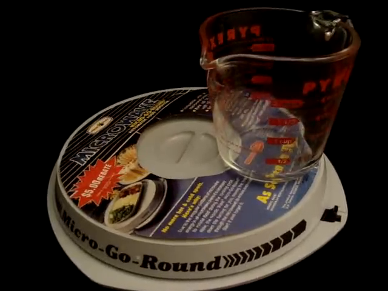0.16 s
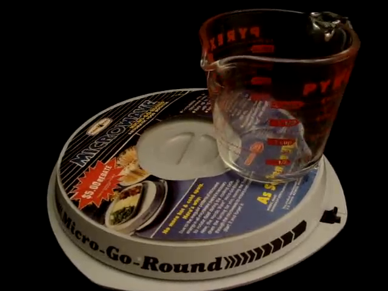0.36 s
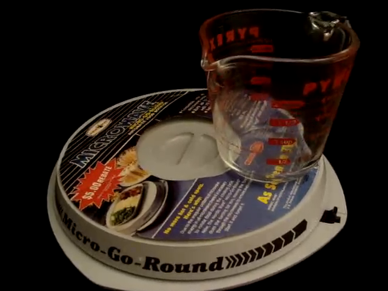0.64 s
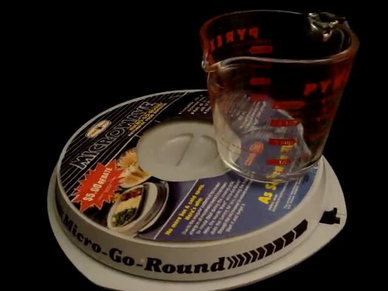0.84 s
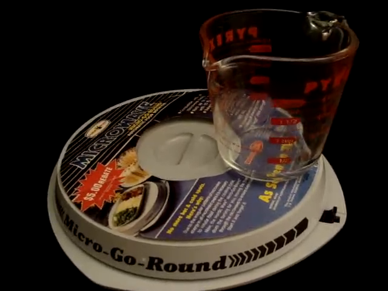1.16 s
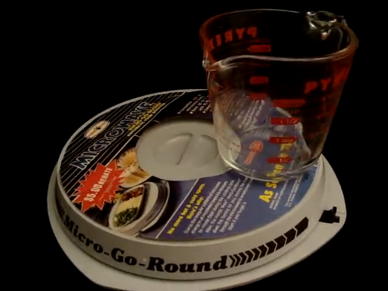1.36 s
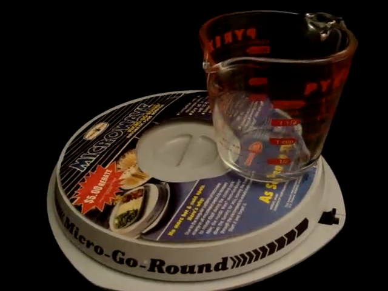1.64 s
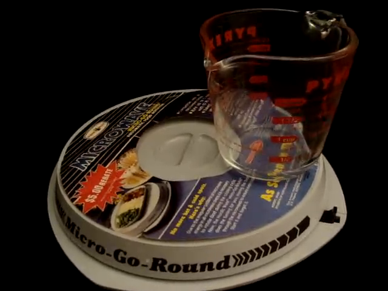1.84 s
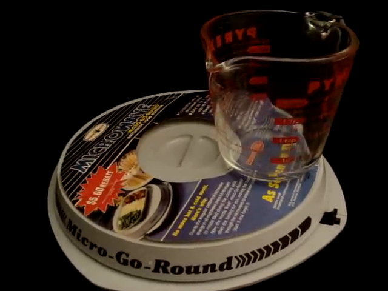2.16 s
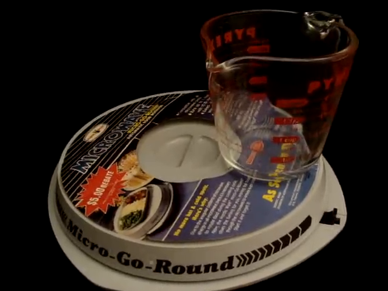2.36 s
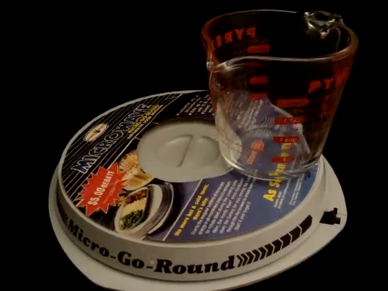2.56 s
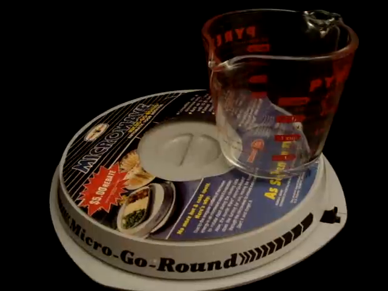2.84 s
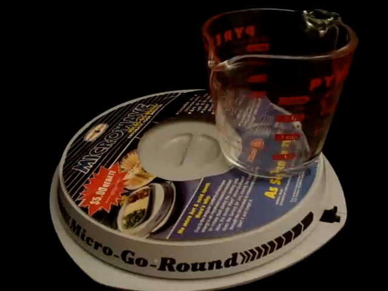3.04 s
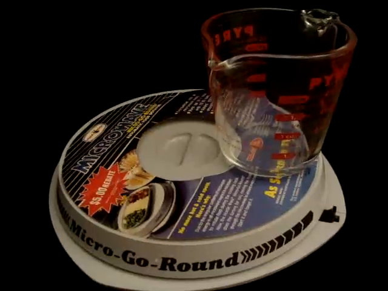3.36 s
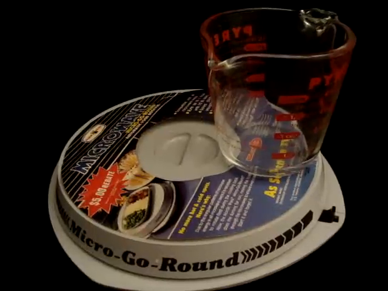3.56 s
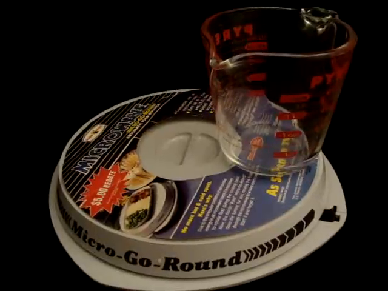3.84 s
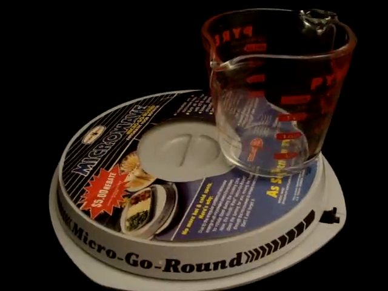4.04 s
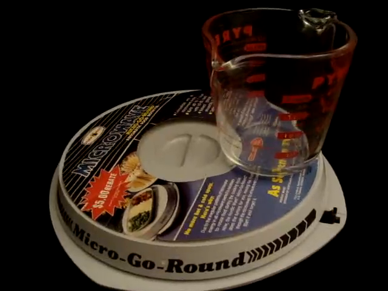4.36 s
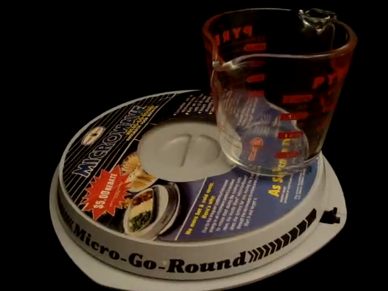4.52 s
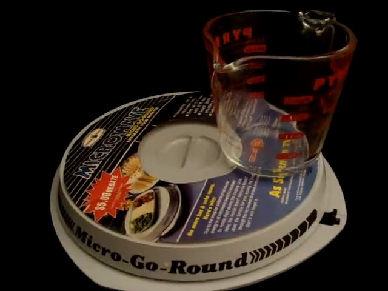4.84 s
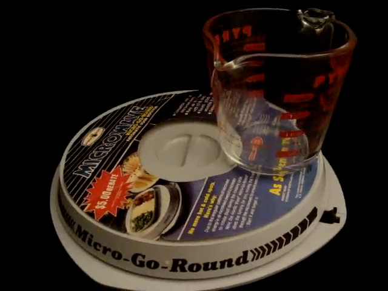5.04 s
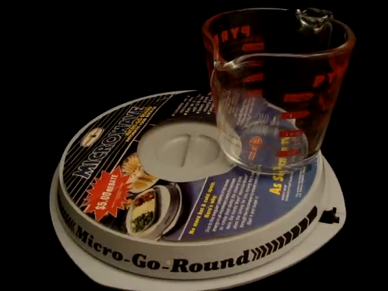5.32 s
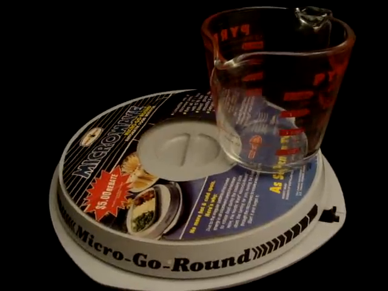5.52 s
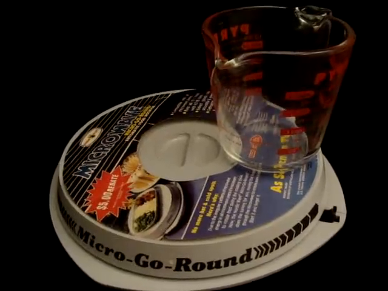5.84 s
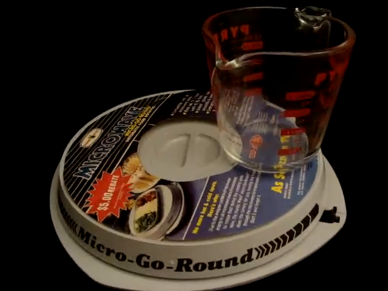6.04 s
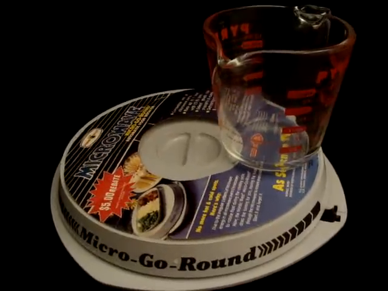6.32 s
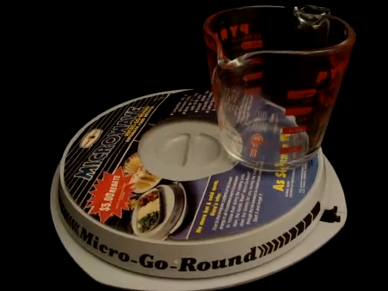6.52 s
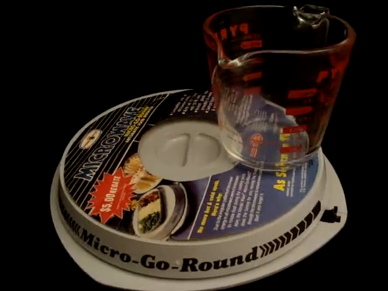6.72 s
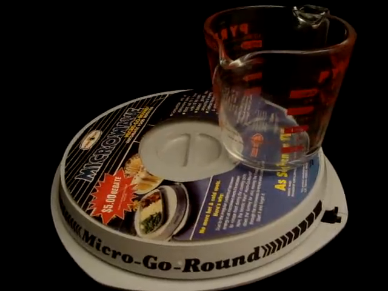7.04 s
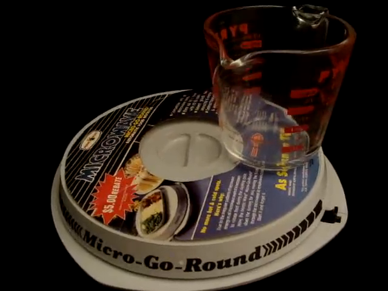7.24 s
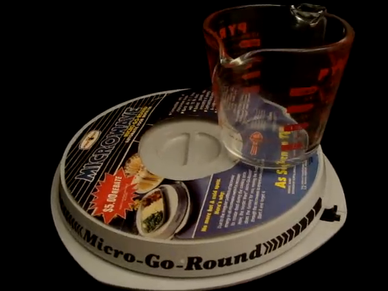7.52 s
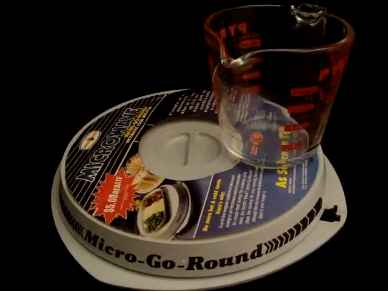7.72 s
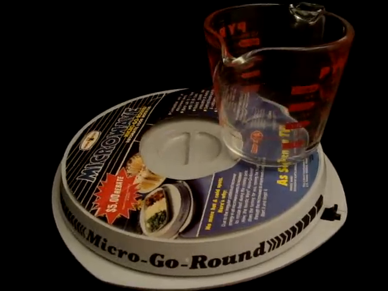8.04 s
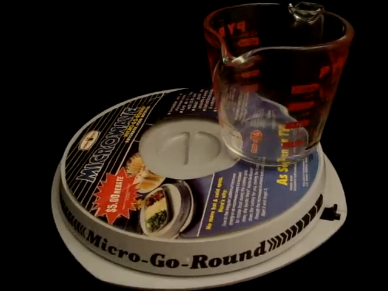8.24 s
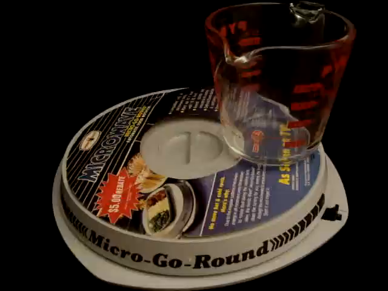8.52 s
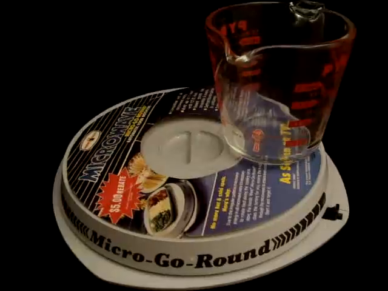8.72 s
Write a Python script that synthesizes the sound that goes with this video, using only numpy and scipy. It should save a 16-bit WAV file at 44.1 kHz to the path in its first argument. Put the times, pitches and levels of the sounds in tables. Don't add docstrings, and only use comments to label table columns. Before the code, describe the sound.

Close to the microphone, a wind-up plastic turntable clicks rapidly, about nine strokes in all each two seconds per side, tick then fuller tock. Each blow starts with a tiny scrape, snaps, and leaves a short gear rattle with hollow case and faint glass ring. Around six and a half seconds one tooth skids in a louder clattering cluster, then the beat resumes. Quiet small room, low far traffic.

```python
import sys
import numpy as np
from scipy import signal
from scipy.fft import rfft, irfft, next_fast_len
from scipy.io import wavfile
from scipy.ndimage import uniform_filter1d, map_coordinates

SR = 44100
rng = np.random.default_rng(int(sys.argv[2]) if len(sys.argv) > 2 else 0)


def attenuation_scalar(level_db):
    decades = np.asarray(level_db, float) / 20
    return 10 ** decades


def digitize_waveform(pressure):
    field = np.atleast_2d(pressure).T
    bounded = np.clip(field, -1, 1)
    quanta = np.round(bounded * 32767).astype(np.int16)
    wavfile.write(sys.argv[1], SR, quanta)


N = 391608

# pitch in Hz, level in dB per Hz.
ROOM_TONE = [(20, -10.5), (60, -4), (150, -3.5), (400, -3), (1000, -2.5), (2000, -11), (4000, -12),
             (7000, -21), (10500, -21)]
TRAFFIC_DB, TRAFFIC_GROWS_DB, TRAFFIC_SWELL_DB = -61.5, 1, 1

# pitch in Hz, width in Hz, level in a tick in dB, level in a tock in dB.
BASE = [(147, 30, -7.5, -2), (278, 20, 2, 4), (344, 85, -2, -10.5)]
CASE = [(393.7, 19, -7, -6.5), (523.8, 12, -7, -2), (565, 35, -7, -2), (655, 36, -12, -0.5),
        (741, 29, -8, -8), (875.8, 35, 5.5, 5.5), (1050.4, 140, -0.5, 6.5), (1177.5, 65, 0, -2.5)]
LID = [(1444, 390, -1.5, -13.5), (1584, 63, 3, 7), (1682.6, 59, 3, 4.5), (1843, 45, 1, 3.5),
       (2048, 83, 0.5, 2.5)]
JUG_GLASS = [(2493, 99, -4.5, -10), (2670, 70, -0.5, -4.5), (2806, 78, -2, -0.5), (3230, 17, -6.5, -3.5),
             (3410, 240, -6.5, -1.5), (3730, 290, 5.5, -1), (4000, 90, 1.5, 0.5), (4263, 140, -2, -6.5)]
GEARS = [(5380, 250, -7, -9.5), (5760, 310, -2, -5.5), (6267, 380, 6.5, 2), (6833, 410, -1.5, -2.5),
         (7233, 250, 0.5, -1.5), (8210, 280, -12, -3), (9120, 790, -20, -22)]
PARTS = BASE, CASE, LID, JUG_GLASS, GEARS

# level in dB, clean tap in dB, graze in dB,
# stretch of the rattle (times), rise of the rattle in seconds.
TICK_REACH = [
    (-11, 11.5, -6.5, 1.35, 0.02),
    (2, 20.5, 0.5, 0.99, 0.0012),
    (-14, 18.5, -6, 0.98, 0.00071),
    (-14, 14.5, -6.5, 0.82, 0.00066),
    (1.5, 11.5, -9, 0.77, 0.00087),
]
TOCK_REACH = [
    (-11.5, 9.23, -10, 1, 0.037),
    (-0.5, 17.7, -0.9, 0.87, 0.0045),
    (-11.5, 17, -1.8, 0.83, 0.0013),
    (-17, 13, 3.7, 0.63, 0.0018),
    (-0.5, 14, 2, 0.67, 0.002),
]

# tick in seconds, how far the tock comes ahead of it in seconds,
# force in dB, share thrown into the lid in dB.
SPRING = [(.016, 0.12, -2, -1), (.672, 0.098, 0, 0.5), (.875, .097, 0, 2.5), (1.726, .098, 0.5, 0.5),
          (1.948, 0.099, 1, -4.5), (2.157, 0.1, -0.5, 0), (2.386, 0.097, 0, -2), (3.052, 0.1, -0.5, 0.5),
          (3.279, 0.1, 0, 0), (3.498, 0.1, -0.5, 0), (3.92, 0.1, 0, -1), (5.217, .098, 0, -1.5),
          (5.45, 0.1, 0.5, 0), (6.354, 0.1, -1, 1.5), (7.409, .096, -0.5, 1.5), (8.264, 0.099, 0, 3.5),
          (8.92, .099, 0.5, 1)]
SPRING_SWING = [0, 3, 4, 8, 9, 10, 11, 14, 15, 16, 18, 24, 25, 29, 34, 38, 41]
# tick in dB, tock in dB, delay of the tock in seconds.
WHEEL_TEETH = [(0.9, .4, -.001), (0.9, -0.32, .001), (-0.8, -1, -.001), (-0.7, 0.5, -.001),
               (0.46, -0.65, .002), (0.9, -0.55, .012)]
# tick in dB, tock in dB.
TOOTH_SCRAPE = [(-1, 0.5), (0, 0), (-1, -1), (-1, 1), (1, -1.5), (-0.5, 4)]
# peak in dB, case boom in dB, gear fizz in dB, graze in dB, fade of the rattle by 60 dB
# in seconds.
USUAL_BLOW = [
    (-12.5, -16.5, -14, -7, 0.07),
    (-9.5, -11.5, -13, -7.5, 0.078),
]
# peak, boom, fizz and graze in dB, rattle fade in seconds.
BLOW_SPREAD = [.3, .5, .5, 3, .004]
# time in seconds, extra level in dB,
# extra share into the lid in dB.
STRAY_BLOWS = [(0.13, 1.1, 0.5), (.231, 0, 0), (.570, 2, 0.5), (0.778, 0.5, -0.5), (1.213, -0.6, 0),
               (2.052, 1.5, -3), (2.283, -1, 2), (3.831, 1.9, 0), (3.920, -0.4, 2.5), (4.041, -.8, 2),
               (4.356, -1, -0.5), (4.474, 1.4, -.4), (4.572, -1.9, 0.5), (4.690, -0.5, 0.1),
               (4.905, 1.1, 1), (5.004, 1, -2), (5.128, 4, -0.3), (5.802, 2, -3), (5.905, -2, 2.5),
               (6.025, 0.5, 1.5), (6.250, 2.7, -3.4), (6.562, 0.5, 0.5), (6.681, 2, -2.5), (6.886, 1, -0.1),
               (7.103, 3, -2.5), (7.837, 2, 1.8), (8.166, 0, 0), (8.264, 3, -0.4), (8.6, -2, -2)]
TICK_LID = 0.18
JAMMED_SWING = 29

# pitch in Hz, fade by 60 dB in seconds.
WALL_FADE = [(200, 0.59), (1000, 0.46), (4000, 0.26), (10000, 0.25)]
# time in seconds, pitch in Hz, level in dB.
ENGINE = [(.35, 62.3, -68), (.84, 58.6, -66), (1.53, 54.2, -62), (1.75, 50.5, -63), (1.81, 47.6, -84)]
# time in seconds, peak in dB.
CREAK_TIMES = [(2.459, -31.5), (2.892, -32), (5.289, -29), (7.9, -35), (8.32, -32)]
CREAK_SOUND = -20, -26, -24, .04
# time in seconds, peak in dB, case boom in dB, gear fizz in dB,
# rattle fade in seconds.
SKID_BLOWS = [
    (6.455, -12.5, -10, -18.5, 0.088),
    (6.468, -11.5, -20, -19, 0.14),
    (6.477, -3.5, -14, -17, 0.025),
    (6.492, -4, -18.5, -21.5, 0.093),
]
CAMERA_STEPS = [127, 31, 31, 15, 15, 9, 9, 7, 7, 5] + [3] * 10


def filtered(x, response):
    m = next_fast_len(N + SR // 2)
    hz = np.fft.rfftfreq(m, 1 / SR)
    return irfft(rfft(x, m) * response(hz), m)[..., :N]


def along(points, hz):
    f, v = np.transpose(points)
    return np.interp(np.log(hz + 1), np.log(f + 1), v)


def room_tone():
    tone = filtered(rng.standard_normal(N), lambda hz: attenuation_scalar(along(ROOM_TONE, hz)))
    return attenuation_scalar(-52.5) * tone / tone.std()


def traffic():
    t = np.arange(N) / SR
    rumble = filtered(rng.standard_normal(N), lambda hz: 1 / (1 + ((hz - 125) / 45) ** 2))
    swell = map_coordinates(rng.standard_normal(30), [2.5 * t])
    level_db = TRAFFIC_DB + TRAFFIC_GROWS_DB * t + TRAFFIC_SWELL_DB * swell - 12
    return attenuation_scalar(level_db) * rumble / rumble.std()


def swing_blows():
    swing = np.arange(SPRING_SWING[-1] + 1)
    columns = np.transpose(SPRING)
    s, lead, force_db, lid_db = [np.interp(swing, SPRING_SWING, column) for column in columns]
    chance = rng.standard_normal((len(swing), 2, len(BLOW_SPREAD))) * BLOW_SPREAD
    rows = []
    for n in swing[:-1]:
        tooth = n % len(WHEEL_TEETH)
        tick_db, tock_db, late = WHEEL_TEETH[tooth]
        tick = s[n], tick_db, TICK_LID * lid_db[n]
        tock = s[n + 1] - lead[n + 1] + late, tock_db, lid_db[n + 1]
        for side, (at, tooth_db, lid) in enumerate((tick, tock)):
            if (n, side) == (JAMMED_SWING, 1):
                continue
            near = (row for row in STRAY_BLOWS if abs(row[0] - at) < .02)
            at, extra_db, extra_lid = next(near, (at, 0, 0))
            lid = lid + extra_lid
            peak_db = force_db[n + side] + tooth_db + extra_db + lid
            change = [peak_db, -lid, -lid, TOOTH_SCRAPE[tooth][side], 0]
            rows.append((side, at, *(USUAL_BLOW[side] + chance[n, side] + change)))
    return rows


def chatter(size, spike_db, clump_db):
    def steps(span):
        return rng.standard_normal(size // span + 1).repeat(span)[:size]

    clumps = uniform_filter1d(steps(120), size=60)
    return attenuation_scalar(spike_db * steps(12) + clump_db * clumps)


def rattle(t, t60, rise, uneven, shiver_db=-99):
    after = np.maximum(t, 0)
    fade = attenuation_scalar(-60 * after / t60) + attenuation_scalar(shiver_db - 25 * after / t60)
    return uneven * rng.standard_normal(len(t)) * fade * (1 - np.exp(-after / rise))


def ringing(modes, side, size, widen):
    f = np.fft.rfftfreq(size, 1 / SR)
    ring = sum(attenuation_scalar(db[side]) * 1j * f * w / (c * c - f * f + 1j * f * w * widen) for c, w, *db in modes)
    low, high = .8 * modes[0][0], 1.15 * modes[-1][0]
    ring = ring * f * f / (low * low - f * f + 1j * f * low)
    ring = ring / (high * high - f * f + 1j * f * high)
    return ring / np.sqrt(np.mean(np.abs(ring) ** 2))


def escapement(blows):
    ahead, size = SR // 50, 2 ** 14
    t = np.arange(-ahead, SR // 5) / SR
    clear = [[ringing(modes, side, size, widen=0.73) for modes in PARTS] for side in range(2)]
    blurred = [[ringing(modes, side, size, widen=1.2) for modes in PARTS] for side in range(2)]
    out = np.zeros(N + SR)
    for side, s, db, boom_db, fizz_db, graze_db, t60 in blows:
        lead = (.0055, .0065)[side]
        bounce_at = t[ahead + rng.integers(90, 260)]
        tap = rfft((t == 0) + rng.normal(0, 0.46) * (t == bounce_at), size)
        uneven = chatter(len(t), spike_db=2.0, clump_db=2.0)
        uneven = uneven / np.sqrt(np.mean(uneven[ahead:ahead + SR // 50] ** 2))
        colour_db = boom_db, boom_db, 0, (fizz_db + 14.0) / 2, fizz_db
        sound = 0
        for part, reach in enumerate((TICK_REACH, TOCK_REACH)[side]):
            level_db, tap_db, touch_db, stretch, rise = reach
            scrape = rattle(t + lead, t60=.06, rise=0.0016, uneven=uneven)
            graze = attenuation_scalar(graze_db + touch_db) * scrape
            fade = stretch * max(t60, .02)
            train = rattle(t, fade, max(rise, 1e-4), uneven, shiver_db=(-16, -12)[side])
            clean = attenuation_scalar(tap_db) * tap * clear[side][part]
            rough = rfft(graze + train, size) * blurred[side][part]
            sound = sound + attenuation_scalar(db + level_db + colour_db[part]) * (clean + rough)
        out[round(s * SR):][:size] += irfft(sound, size)
    return out[ahead:N + ahead]


def room_echo(x, count=6):
    hz, t, z = signal.stft(rng.standard_normal((count, SR // 2)), SR, nperseg=256)
    fade = attenuation_scalar(-60 * t / along(WALL_FADE, hz)[:, None])
    tails = signal.istft(z * fade, SR, nperseg=256)[1]
    turns = np.arange(N) // (SR // 9) % count == np.arange(count)[:, None]
    answer = signal.fftconvolve(turns * x, tails / np.linalg.norm(tails[0]), axes=1).sum(axis=0)
    return np.pad(answer, (300, 0))[:N]


def engine_hum():
    t = np.arange(N) / SR
    s, hz, db = np.transpose(ENGINE)
    level = np.sqrt(2) * attenuation_scalar(np.interp(t, s, db, left=-99, right=-99))
    return level * np.sin(2 * np.pi * np.cumsum(np.interp(t, s, hz)) / SR)


def creak_blows():
    return [(0, at, db, *CREAK_SOUND) for at, db in CREAK_TIMES]


def skid_blows():
    rows = []
    for k, (at, db, boom_db, fizz_db, t60) in enumerate(SKID_BLOWS):
        rows.append((1 - k % 2, at, db, boom_db, fizz_db, -8, t60))
    return rows


def scene():
    ticks = escapement(swing_blows() + creak_blows() + skid_blows())
    air = room_tone() + traffic() + engine_hum()
    return (ticks + attenuation_scalar(-26.5) * room_echo(ticks) + air)[None]


def camera_bands(x):
    lead_in, n, bands = 1143, np.arange(544), len(CAMERA_STEPS)
    z = np.pad(signal.resample_poly(x, 320, 441), (lead_in + 543, 4096))
    window = np.pad(signal.firwin(513, .0178, window=("kaiser", 9)), (0, 31))
    turn = (2 * np.arange(bands)[:, None] + 1) * np.pi / 64
    slices = np.lib.stride_tricks.sliding_window_view(z, 544)[::32, ::-1]
    sub = slices @ (window * np.cos(turn * (n - 16))).T
    frames = sub[:len(sub) // 36 * 36].reshape(-1, 36, bands)
    loudest = np.abs(frames).max(axis=1, keepdims=True)
    scale = 2 ** (np.ceil(3 * np.log2(loudest + 1e-9)) / 3)
    step = 2 * scale / CAMERA_STEPS
    rounded = (np.round(frames / step) * step).reshape(-1, bands)
    pieces = (rounded @ (128 * window * np.cos(turn * (n + 16)))).reshape(-1, 17, 32)
    out = sum(np.pad(pieces[:, j], ((j, 17 - j), (0, 0))) for j in range(17)).ravel()
    return signal.resample_poly(out[lead_in + 512:], 441, 320)[:N]


def roll_off(x):
    return signal.sosfilt(signal.butter(12, 11120, fs=SR, output="sos"), x)


def record(dry):
    mix = camera_bands(dry[0])[None]
    return roll_off(mix)


dry = scene()
out = record(dry)
digitize_waveform(out)
```